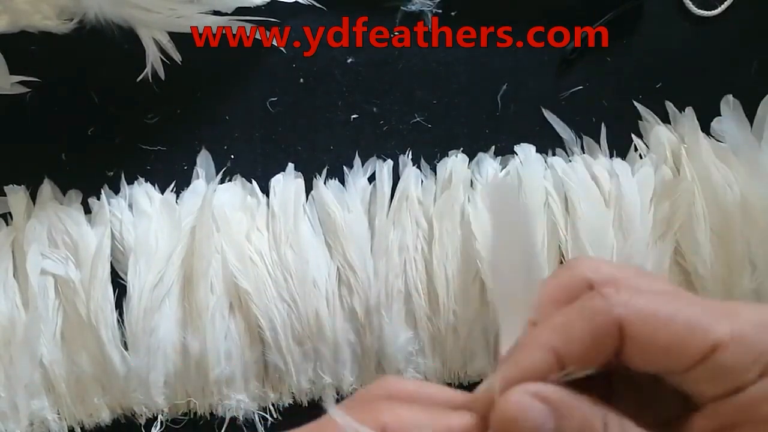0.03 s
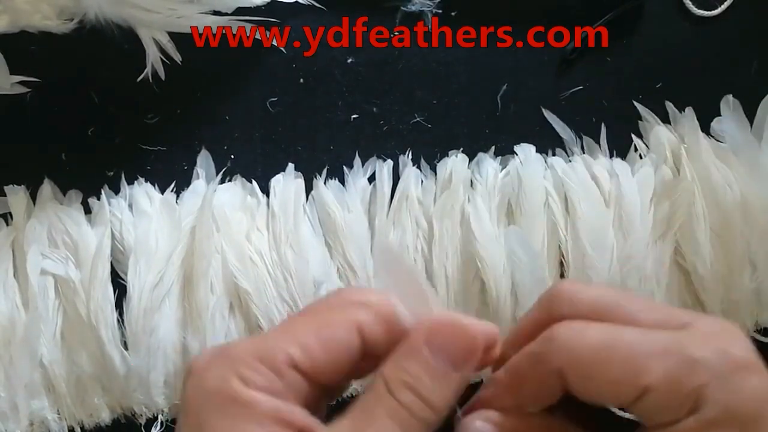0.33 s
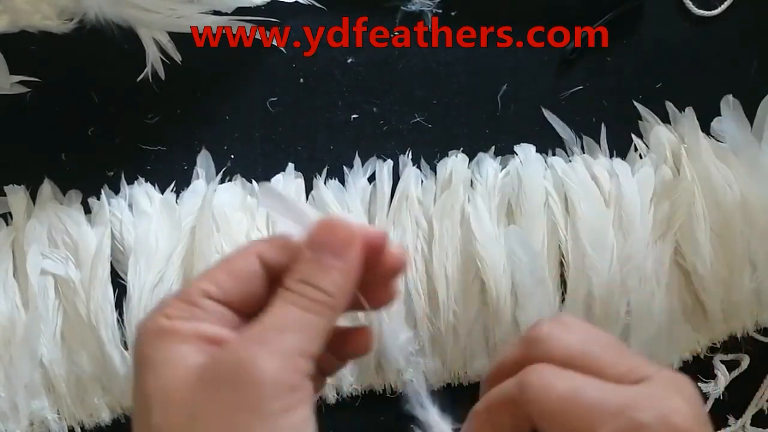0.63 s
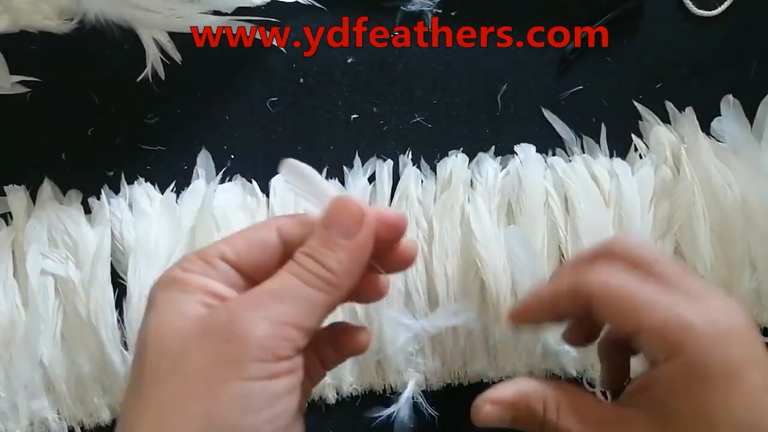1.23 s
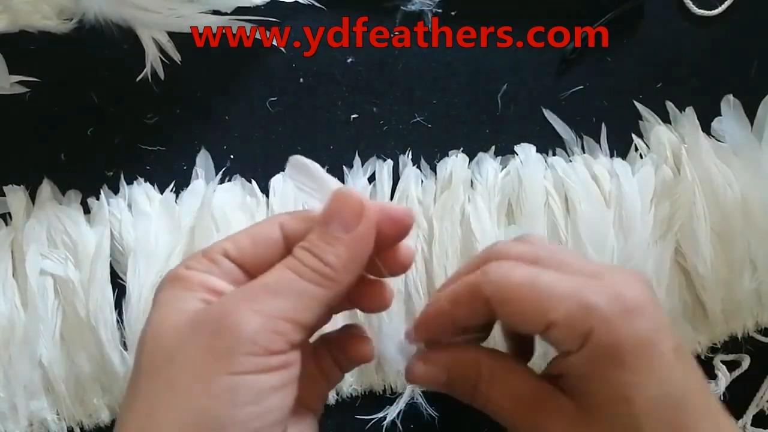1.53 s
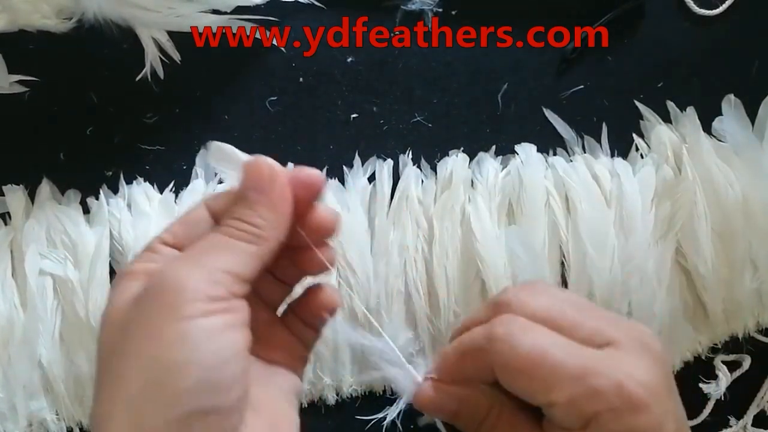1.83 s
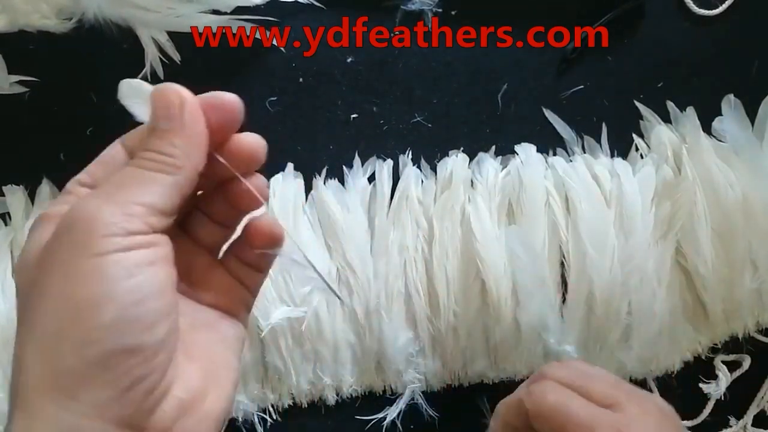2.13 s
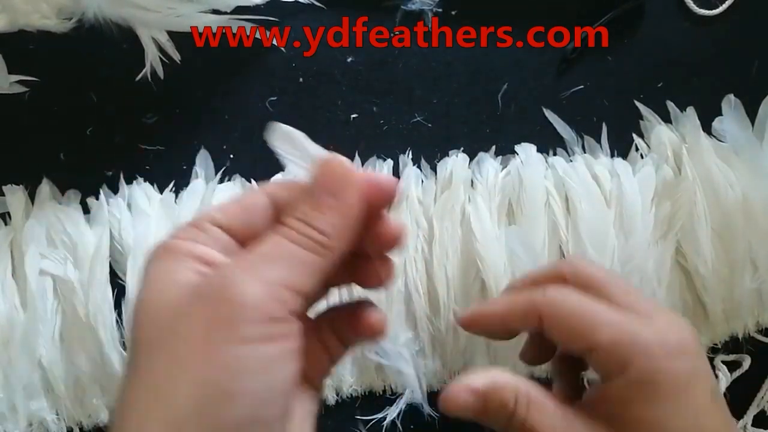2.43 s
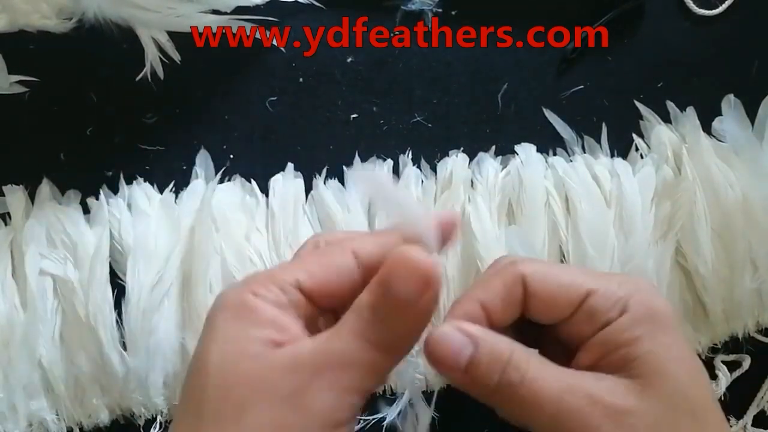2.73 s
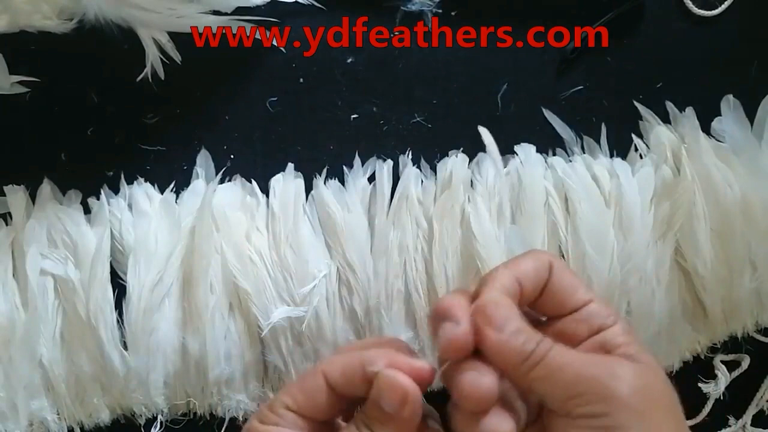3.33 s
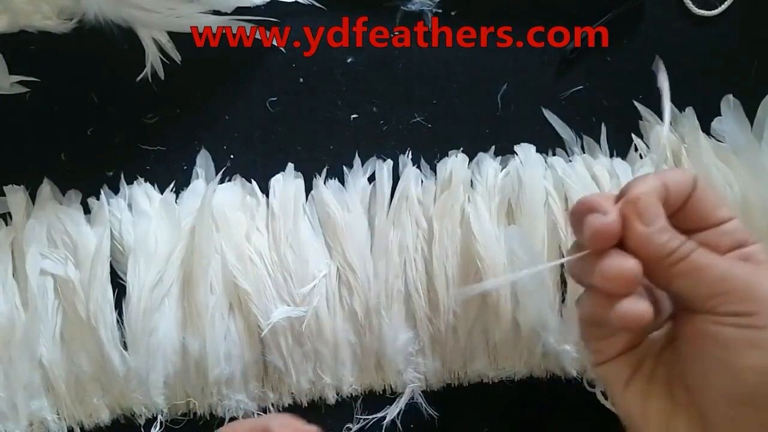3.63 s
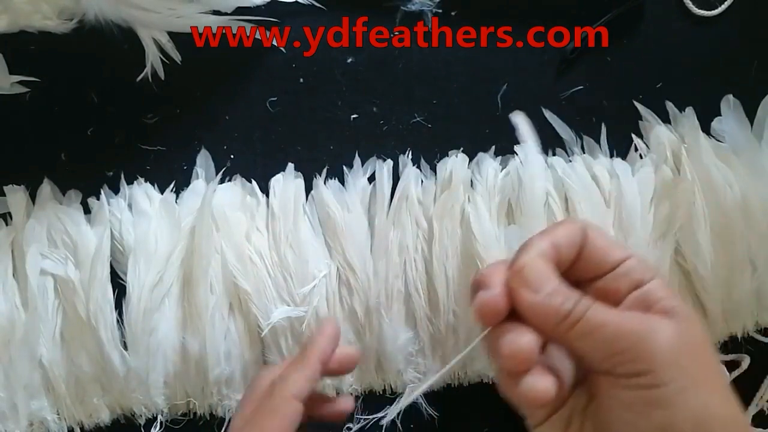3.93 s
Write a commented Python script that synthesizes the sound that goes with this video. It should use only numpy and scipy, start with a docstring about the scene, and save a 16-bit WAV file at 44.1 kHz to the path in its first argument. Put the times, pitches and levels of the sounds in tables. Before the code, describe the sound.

Fingers strip a dry feather close by, in faint crackling strokes that swell and fade. A cluster of tiny sharp snaps comes around 0.8 seconds. At about 2 seconds there is one short, high, falling squeak, then more rubbing and ticks. Softer strokes follow, until stronger tearing with small snaps from 3.5 to 4 seconds. A low, throbbing motor hum and hiss run throughout in the quiet room.

```python
"""A dry crackle swells and fades, stroke after stroke, as fingers strip the barbs off a feather.
The barbs (its thin side branches) flick past the fingertips over the duller rub of skin.
A few barbs snap, and one short squeak rings in the quiet workroom. Behind it all,
two motor tones throb against each other over mains hum, rumble and hiss."""
import sys
import numpy as np
from scipy import signal
from scipy.fft import rfft, irfft
from scipy.io import wavfile

SR = 44100
rng = np.random.default_rng(int(sys.argv[2]) if len(sys.argv) > 2 else 0)


def master_out(mix):
    """Clip the mix to full scale and print it as 16-bit PCM to the path in sys.argv[1]."""
    frames = np.transpose(np.atleast_2d(mix))
    ceiling = np.clip(frames, -1, 1)
    pcm = np.round(ceiling * 32767).astype(np.int16)
    wavfile.write(sys.argv[1], SR, pcm)


N = 176400  # 4 seconds
CLICKS_PER_S, FIZZ_CLICKS_PER_S = 18000, 2900


def strokes():
    """In each stroke barbs flick past the fingertips, skin rubs, and tiny hairs fizz as they part."""
    # finger strokes: (peak time [s], rise [s], fall [s], barb level [dB], skin level [dB],
    # fizz level [dB], left minus right [dB])
    finger_strokes = [(0.05, 0.12, 0.092, -62, -56.5, -70, 0), (0.19, .02, 0.03, -58.5, -68, -70, 0),
                      (0.31, 0.063, 0.04, -59, -61, -59.5, -3), (0.51, 0.071, 0.05, -54, -57, -60, 1.5),
                      (0.64, 0.069, 0.024, -55, -60, -60, 0.5),
                      (0.765, 0.085, 0.089, -49, -54.5, -52.5, -0.5),
                      (0.96, 0.044, 0.071, -57.5, -62, -74, -1), (1.11, 0.055, 0.039, -56.5, -57, -58, 0),
                      (1.50, 0.088, 0.053, -60.5, -62.5, -69, -5), (1.91, 0.074, 0.044, -57, -59, -61, -1),
                      (2.01, 0.048, 0.071, -52.5, -52.5, -55, 0),
                      (2.125, 0.04, 0.025, -52, -47.5, -58, -0.5),
                      (2.168, 0.021, 0.028, -47, -49.5, -58, -2.5), (2.24, 0.026, 0.032, -59, -59, -60, 1),
                      (2.37, 0.034, 0.042, -59, -60, -61, -1), (2.67, 0.065, 0.042, -57, -58, -64, -3.5),
                      (2.92, 0.075, 0.064, -58, -62.5, -72, 4.5), (3.11, 0.089, 0.055, -70, -58, -66, 1),
                      (3.36, 0.12, 0.054, -56, -60.5, -63, -2), (3.565, 0.025, 0.071, -47.5, -63, -61, 1),
                      (3.64, 0.01, 0.011, -59, -54, -60, -4), (3.68, 0.045, 0.052, -42, -58, -48, 0),
                      (3.78, 0.061, 0.1, -44, -53.5, -52, 4), (3.903, .008, .014, -51, -71, -60, 3),
                      (3.955, 0.022, 0.047, -48.5, -56.5, -58, 4.5)]
    # tone of the bright barbs, dull skin and thin fizz: (frequency [Hz], relative level [dB])
    barb_spectrum = [(800, -10), (1800, -12), (2300, -26), (2800, -3), (3300, -1.5), (3900, -5),
                     (4600, -3.5), (5400, 2), (7000, 2.5), (8200, 1), (9500, -3), (11500, -8), (13500, -10),
                     (14800, -5), (15600, -12)]
    skin_spectrum = [(200, -43), (500, -2.5), (1100, -1), (1700, -7), (2200, -3.5), (3200, -4), (4500, -9),
                     (9000, -64)]
    fizz_spectrum = [(5000, -26), (8000, -17), (9800, -2.5), (12000, 0), (13600, -2), (14800, 2),
                     (15600, -5.5)]
    t = np.arange(N) / SR
    barb_power, skin_power, fizz_power = 0, 0, 0
    for at, rise, fall, barb_db, skin_db, fizz_db, side_db in finger_strokes:
        swell = bell(t - at, np.where(t < at, rise, fall)) * pan(side_db)
        barb_power += (swell * undb(barb_db)) ** 2
        skin_power += (swell * undb(skin_db)) ** 2
        fizz_power += (swell * undb(fizz_db)) ** 2
    catch = undb(1.2 * wander(rate=400))  # all three catch unevenly, together
    barbs = colour(crackle(CLICKS_PER_S) * np.sqrt(barb_power) * catch, barb_spectrum)
    skin = colour(crackle(CLICKS_PER_S) * np.sqrt(skin_power) * catch, skin_spectrum)
    fizz = colour(crackle(FIZZ_CLICKS_PER_S) * np.sqrt(fizz_power) * catch, fizz_spectrum)
    return barbs + skin + fizz


def feather_rings():
    """While the feather is pulled tight, the crackle of its barbs makes it ring."""
    # moments of ringing: (peak time [s], spread in time [s], pitch [Hz], width [Hz], level [dB])
    rings = [(0.875, 0.0054, 2080, 420, -47), (2.121, 0.0067, 1150, 250, -50),
             (3.61, 0.065, 2770, 450, -51.5), (3.645, 0.013, 940, 400, -52.5),
             (3.785, 0.03, 5370, 400, -47.5), (3.8, 0.03, 8000, 900, -51.5)]
    t = np.arange(N) / SR
    freqs = np.arange(N // 2 + 1) * SR / N
    sound = 0
    for at, spread, hz, width, db in rings:
        resonance = 1 / (1 + 1j * (freqs - hz) / width) ** 2  # passes a narrow band around the pitch
        ring = unit(irfft(rfft(crackle(CLICKS_PER_S)) * resonance, N))
        sound += ring * undb(db) * bell(t - at, spread)
    return sound


def snaps():
    """A barb lets go: a small knock of the shaft, a broad crack and a very bright tick."""
    # snapping barbs: (time [s], decay [s], knock level [dB], crack level [dB], tick level [dB],
    # left minus right [dB])
    barb_snaps = [(0.2005, .0012, -60, -49, -62, -2), (0.5200, .0015, -43, -56, -60, -4),
                  (0.7515, .001, -55, -39, -52, -1), (0.796, 0.0022, -49, -48, -37, -5),
                  (0.8002, .0008, -42, -42, -38, -6), (0.8325, .004, -64, -52, -42, -6),
                  (0.8365, 0.0006, -51, -40, -26, -5), (0.8720, .0005, -55, -33, -33, -11),
                  (0.8737, 0.00039, -31.5, -28.5, -25, 0), (0.8755, 0.00073, -45, -33, -40, -12),
                  (1.589, 0.0029, -57, -45, -46, -8), (1.919, 0.0023, -45, -49, -66, -5),
                  (2.1339, .0025, -48, -37.5, -47, 0), (2.149, 0.00068, -53, -46, -50, -1),
                  (2.175, .002, -53, -47, -54, -3), (2.341, 0.007, -58, -43, -51, 0),
                  (3.5457, 0.0028, -47, -38.5, -53, 6), (3.5783, 0.00091, -46, -40, -54, 5),
                  (3.5974, 0.00056, -41, -33, -58, -3), (3.674, .0008, -50, -43, -48, -1),
                  (3.767, 0.0018, -56, -41, -50, 3), (3.963, 0.001, -47, -43, -52, 1)]
    # tone of the three parts of a snap: (frequency [Hz], relative level [dB])
    knock_spectrum = [(400, -9), (1100, 7.5), (2100, 8), (3000, -12), (6000, -23)]
    crack_spectrum = [(2500, -27), (3800, -8.5), (5400, 5.5), (8000, -1.5), (11000, -1.5), (13500, -1),
                      (15500, -2)]
    tick_spectrum = [(4000, -46), (10000, -18), (13000, -10), (14200, 1), (14850, 11), (15500, 5)]
    rise_s = 0.00014
    t = np.arange(N) / SR
    knock, crack, tick = 0, 0, 0
    for at, decay, knock_db, crack_db, tick_db, side_db in barb_snaps:
        burst = np.exp(-np.abs(t - at) / np.where(t < at, rise_s, decay)) * pan(side_db)
        knock += burst * undb(knock_db)
        crack += burst * undb(crack_db)
        tick += burst * undb(tick_db)
    sound = 0
    for level, spectrum in [(knock, knock_spectrum), (crack, crack_spectrum), (tick, tick_spectrum)]:
        noise = np.sign(rng.standard_normal((2, N)))
        sound += colour(level * noise, spectrum)
    return sound


def squeak():
    """A few barbs squeak together, clean at first, then rough and apart as their pitch falls."""
    # course of the squeak: (time [s], pitch [Hz], relative level [dB], wobble [share of pitch])
    glide = [(1.955, 3560, -67, 0.0065), (1.977, 3510, -47, 0.0084), (1.992, 3470, -49, .018),
             (2.003, 3260, -40.5, 0.033), (2.026, 3193, -38, 0.0394), (2.041, 3190, -34.5, 0.042),
             (2.056, 3060, -32, 0.053), (2.069, 3020, -47, 0.039), (2.085, 2960, -68, .04)]
    # the barbs that squeak: (pitch offset [multiples of the wobble], relative level [dB])
    barbs = [(1.6, -3), (0.12, 1.5), (-1.6, -4.5)]
    pitch, level_db, wobble = curve(glide), curve(glide, column=2), curve(glide, column=3)
    t = np.arange(N) / SR
    voices = 0
    for offset, db in barbs:
        hz = pitch * (1 + wobble * (offset + wander(rate=304)))
        flutter_db = 5 * wander(rate=250)
        voices += np.sin(2 * np.pi * np.cumsum(hz) / SR) * undb(db + flutter_db)
    sounding = (t > glide[0][0]) & (t < glide[-1][0])
    direct = unit(voices) * undb(level_db) * sounding
    nearby_surfaces = undb(-6.5) * echoes(direct, fade_s=0.044)
    room_tail = undb(-7) * echoes(direct, fade_s=0.48)
    return undb(-10.5) * direct + nearby_surfaces + room_tail


def echoes(x, fade_s):
    """Dense echoes, different left and right, that die away by 60 dB in fade_s seconds."""
    tail = rng.standard_normal((2, N)) * np.exp(-np.log(1000) * np.arange(N) / SR / fade_s)
    return signal.fftconvolve(x[None], unit(tail) / np.sqrt(N), axes=1)[:, :N]


def motors():
    """Two motor tones close in pitch throb together, among weaker hums from shafts and mains power."""
    # loudness of the upper and lower motor tone: (time [s], level [dB])
    upper_level = [(0, -44.5), (.23, -54), (.33, -53), (.49, -43.5), (.69, -54), (.82, -49.5), (3.55, -49),
                   (3.72, -56.5), (3.85, -43), (4, -48.5)]
    lower_level = [(0, -54.5), (.22, -53), (.33, -61), (.65, -72), (.85, -57.5), (1.15, -53), (3.6, -55.5),
                   (3.8, -61), (4, -62)]
    # weaker hums: (pitch [Hz], level [dB], left minus right [dB])
    hums = [(31.7, -59.5, -2), (117, -64.5, -5), (150, -66, -7), (292, -68, -1), (300, -71, -1),
            (350, -65, 0), (400, -69, 1), (1866, -74, -2)]
    motor_waver_db, hum_waver_db = 1.86, 2.5
    upper = tone(hz=197.3, db=curve(upper_level) + motor_waver_db * wander(rate=2.8))
    lower = tone(hz=174.8, db=curve(lower_level) + motor_waver_db * wander(rate=4.3))
    hum = sum(tone(hz, db + hum_waver_db * wander(rate=2.0)) * pan(side_db) for hz, db, side_db in hums)
    return (upper + lower) * pan(-9.5) + hum


def room_noise():
    """The room has a low rumble, mostly shared by left and right, and a wide, smooth hiss."""
    # tone of the rumble and the hiss: (frequency [Hz], relative level [dB])
    rumble_spectrum = [(12, 4.5), (28, -3), (48, -9.5), (80, -1), (120, 0), (215, -2.5), (270, -7),
                       (400, -8), (700, -13.5), (1500, -21), (6000, -53)]
    hiss_spectrum = [(150, -2.5), (300, -5.5), (420, -10), (700, -8), (1150, -11.5), (2100, -15),
                     (2900, -14.5), (4100, -19), (5400, -14.5), (6100, -17), (7100, -13), (8200, -21.5),
                     (9200, -20), (12500, -21), (13800, -19.5), (14800, -17), (15600, -20.5)]
    air = rng.standard_normal(N) + undb(-12.5) * rng.standard_normal((2, N))
    rumble = colour(air, rumble_spectrum) * undb(-53) * pan(3.5)
    hiss = colour(rng.standard_normal((2, N)), hiss_spectrum) * undb(-51)
    return rumble + hiss


def crackle(rate):
    """Tiny clicks of uneven size, about rate a second, separate for left and right."""
    hits = rng.random((2, N)) < rate / SR
    clicks = hits * rng.standard_normal((2, N))
    boost_db = 1.15 * np.minimum(rng.exponential(size=(2, N)), 2 * np.e)
    return unit(clicks * undb(boost_db))


def tone(hz, db):
    """A pure tone whose average (rms) level is db."""
    return np.sqrt(2) * undb(db) * np.sin(2 * np.pi * (hz * np.arange(N) / SR + rng.random()))


def wander(rate):
    """A smooth random drift of typical size 1 that changes about rate times a second."""
    freqs = np.arange(N // 2 + 1) * SR / N
    return unit(irfft(rfft(rng.standard_normal(N)) * np.exp(-(freqs / rate) ** 2), N))


def bell(offset, spread):
    """A smooth hump that peaks at 1 where offset is zero."""
    return np.exp(-(offset / spread) ** 2 / 2)


def curve(rows, column=1):
    """One column of a table, joined by straight lines in time."""
    rows = np.array(rows)
    return np.interp(np.arange(N) / SR, rows[:, 0], rows[:, column])


def response(points):
    """Fill in a table of (frequency [Hz], level [dB]) for every frequency."""
    hz, db = np.array(points).T
    return np.interp(np.log(np.arange(N // 2 + 1) * SR / N + 1), np.log(hz), db)


def colour(x, spectrum):
    """Shape the tone of x; white noise keeps its overall power."""
    return irfft(rfft(x) * unit(undb(response(spectrum))), N)


def pan(db):
    """Left and right gains that make the left side louder by db."""
    return undb(np.array([[db], [-db]]) / 2)


def undb(db):
    """Turn decibels into a gain."""
    return 10 ** (np.asarray(db) / 20)


def unit(x):
    """Scale to an average (rms) size of 1."""
    return x / np.sqrt(np.mean(x ** 2))


def scene():
    """The feather in front, the room behind."""
    return strokes() + feather_rings() + snaps() + squeak() + motors() + room_noise()


def record(dry):
    """A nearby phone's two microphone openings each colour the sound; the highest treble is cut."""
    # how the two openings differ: (frequency [Hz], left minus right [dB])
    openings = [(300, -2), (1500, -1.5), (3000, -0.5), (4500, -0.5), (5400, -3), (6700, -5), (7400, -0.5),
                (8200, 12), (9300, -1), (11000, 3), (13500, -4.5), (14800, -1), (15600, -6)]
    side_gains = undb(np.array([[1], [-1]]) * response(openings) / 2)
    coloured = irfft(rfft(dry) * side_gains, N)
    top_hz = 15550
    treble_cut = signal.ellip(10, .2, 80, top_hz, fs=SR, output="sos")
    return signal.sosfilt(treble_cut, coloured)


dry = scene()
out = record(dry)
master_out(out)
```